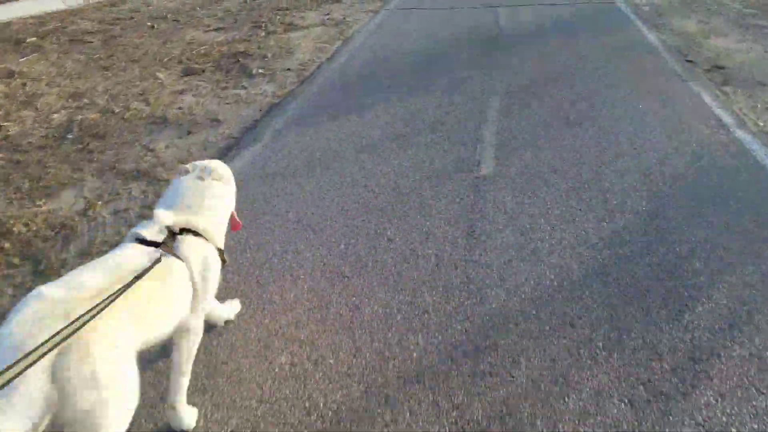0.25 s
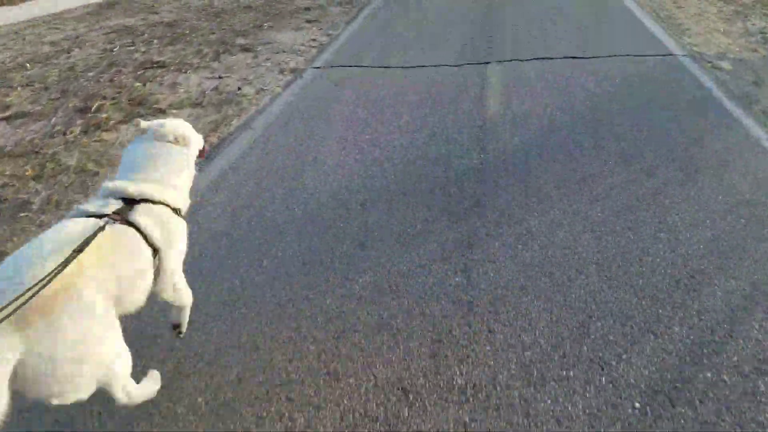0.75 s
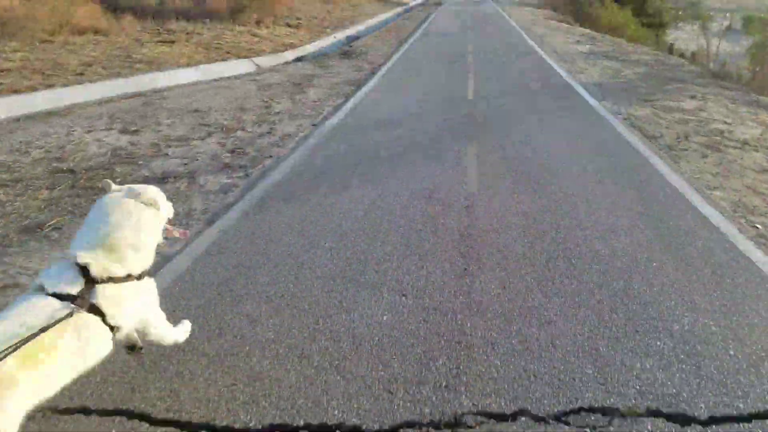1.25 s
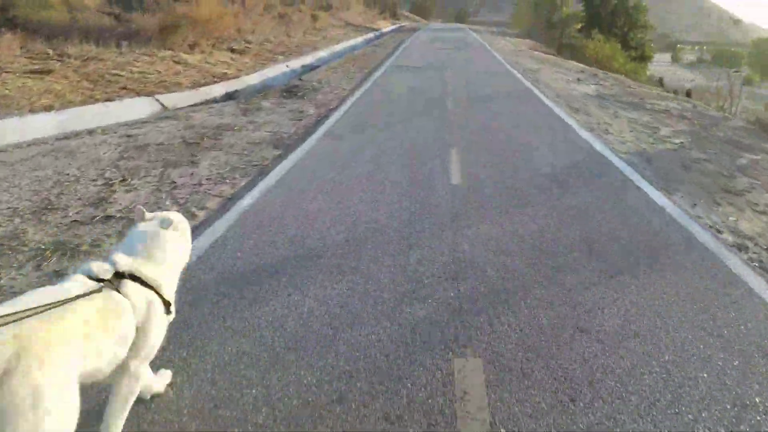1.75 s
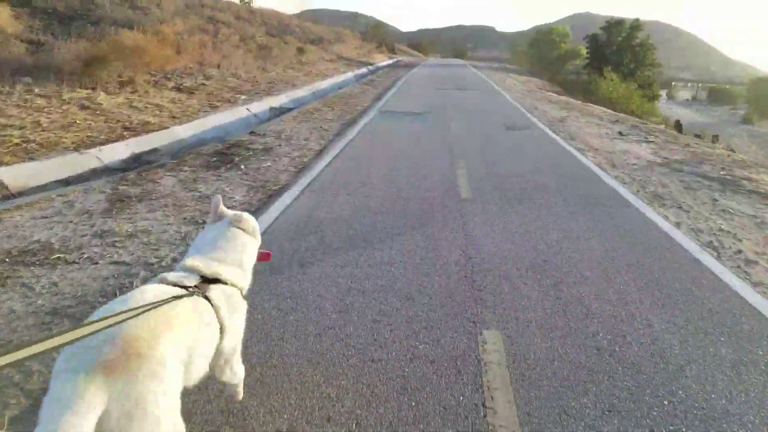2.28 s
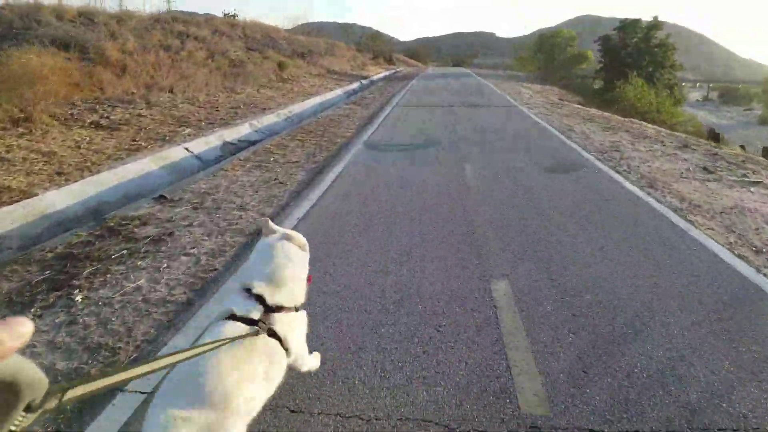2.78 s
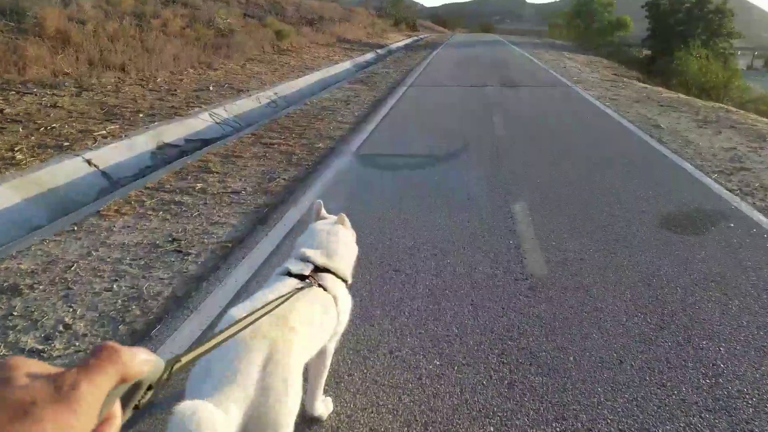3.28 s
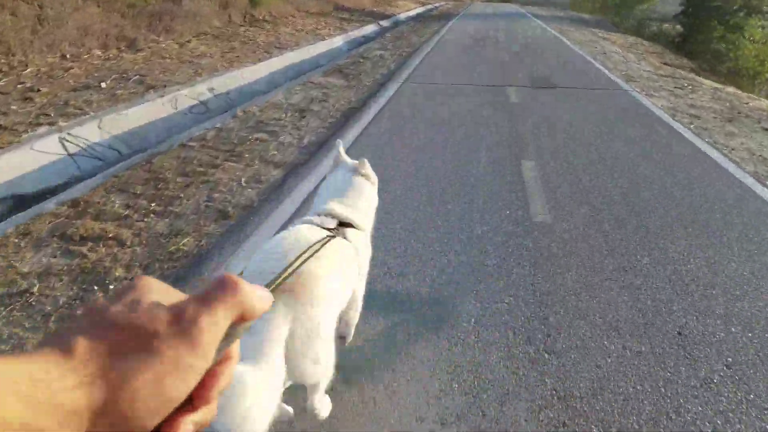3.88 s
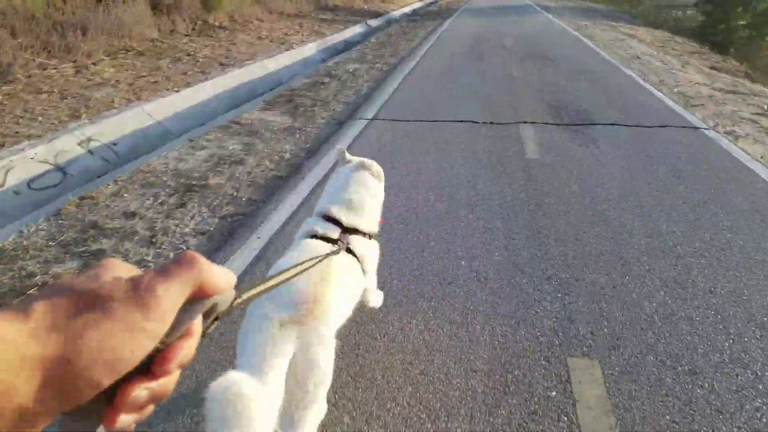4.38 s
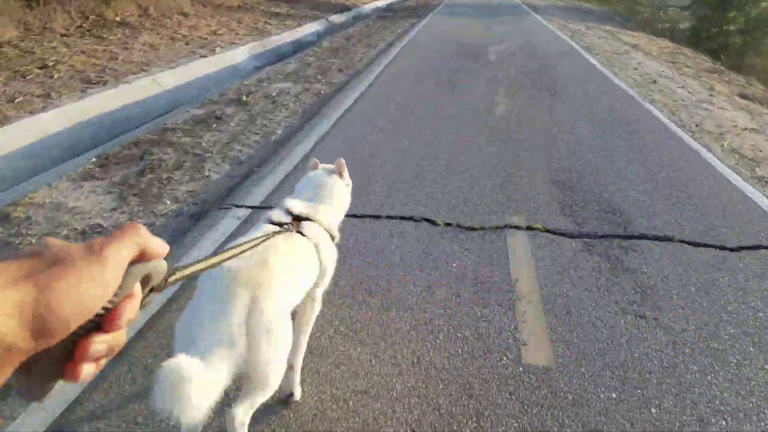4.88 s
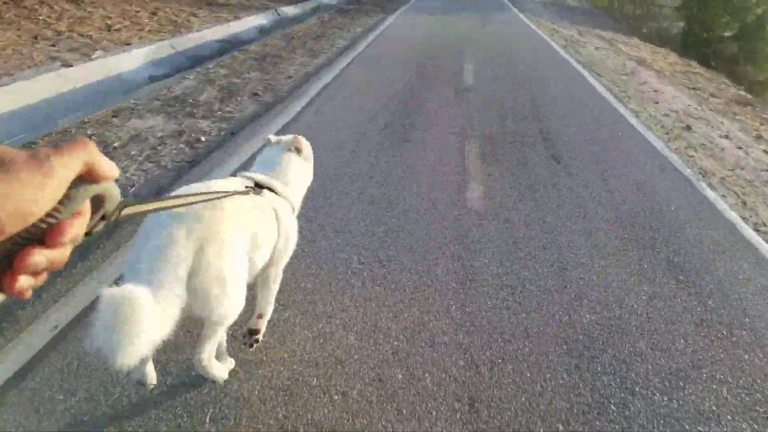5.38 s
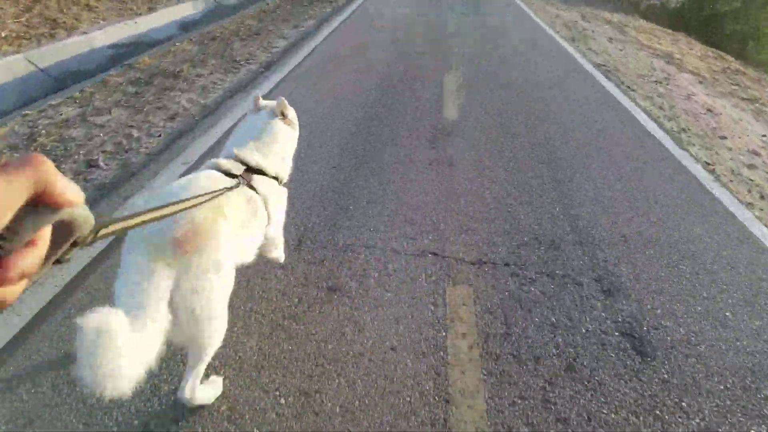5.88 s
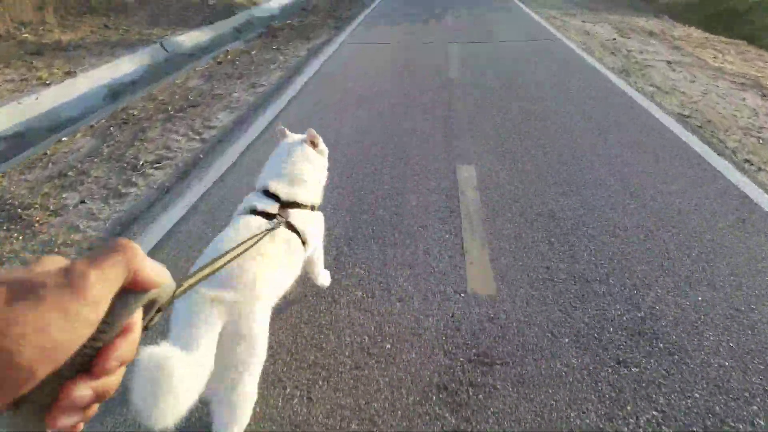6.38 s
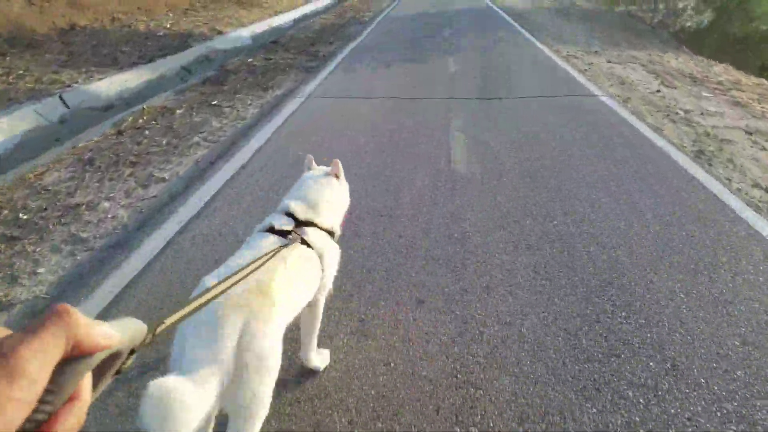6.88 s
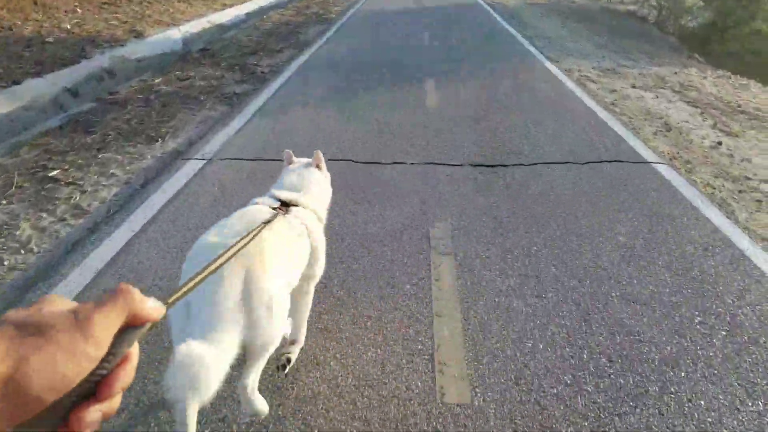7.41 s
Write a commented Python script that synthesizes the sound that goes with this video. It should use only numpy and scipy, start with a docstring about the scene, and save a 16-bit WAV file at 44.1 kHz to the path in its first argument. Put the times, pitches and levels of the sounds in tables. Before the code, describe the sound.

A steady gritty board roll on a paved trail, buffeted by bursts of wind, with dry dog claws ticking and faint tag clinks.

```python
"""Longboard ride behind a dog

A longboard rolls over asphalt, pulled by a trotting dog, heard through a two-port hand-held microphone.
Road grit shakes the deck in its low modes and hisses under the wheels; the axles knock over cracks.
Wind rumbles at each port on its own and tears into chains of bright pops, with small crackle around them.
Dry ticks, most of them the dog's claws, are short noise bursts; its metal tag clinks as two fading tones."""
import sys
import numpy as np
from scipy import signal
from scipy.fft import rfft, irfft
from scipy.io import wavfile
from scipy.ndimage import uniform_filter1d

SR = 44100
rng = np.random.default_rng(int(sys.argv[2]) if len(sys.argv) > 2 else 0)


def boost_factor(decibels):
    """Convert a level in decibels to a linear amplitude factor."""
    exponent = np.asarray(decibels, float) / 20
    return 10 ** exponent


def bounce(signal):
    """Save signal as a 16-bit WAV file at the path given by the first command-line argument."""
    frames = np.transpose(np.atleast_2d(signal))
    limited = np.clip(frames, -1, 1)
    pcm = np.round(limited * 32767).astype(np.int16)
    wavfile.write(sys.argv[1], SR, pcm)


N = 337365

# Road under the wheels: t/s, relative level of the coarse texture/dB, relative level of the fine grit/dB
ROAD = [(0.0, -20, -47), (0.36, -21, -47.5), (0.74, -14.5, -43), (0.98, -21, -47.5), (1.47, -19.5, -49.5),
        (2.071, -19, -48.5), (2.4, -17, -44.5), (3.3, -19, -48), (3.711, -17, -44.5), (4.22, -20, -47),
        (5.048, -14.5, -42.5), (5.39, -17, -44.5), (5.52, -14.5, -45), (5.59, -22, -48), (5.7, -21, -49),
        (5.88, -31, -51.5), (6.5, -25.5, -53), (6.95, -28, -48), (7.37, -19, -45.5), (7.65, -24.5, -50)]
# Colour of the hiss at each port, its top end cut off steeply:
# f/Hz, relative level left/dB, relative level right/dB
HISS_COLOUR = [(774, 26.5, 26), (1320, -21, -3.5), (1750, 14.5, 12), (2620, 8, 10), (2720, 1.5, 2.5),
               (4340, -2, 6), (7000, -6, -4), (7780, -7.5, -6.5), (8900, -27.5, -33.5), (10540, -7, -49.5),
               (13000, -13, -22), (14500, -6.5, -11.5), (15400, -56.5, -48)]
# Spells of rough air on one port: start t/s, length/s, drive/dB, port (0 left, 1 right)
ROUGH_AIR = [(0.032, 0.18, -11.5, 1), (0.786, 0.34, -11, 0), (0.921, 0.033, -4.5, 1), (1.031, 0.09, 2, 0),
             (1.144, .07, -8.5, 1), (1.217, 0.05, -3.5, 0), (1.418, 0.031, -2.5, 0), (1.647, 0.083, -7, 0),
             (1.767, 0.2, -12, 0), (1.834, 0.097, -13, 1), (2.303, 0.23, -11, 0), (2.442, 0.14, -11, 1),
             (2.587, 0.09, -3, 0), (2.954, 0.07, -6, 0), (3.054, 0.11, -9, 1), (3.081, .08, -5, 0),
             (4.055, 0.18, -15.5, 0), (5.249, 0.082, -10, 1), (5.324, 0.078, -11, 0),
             (5.529, 0.21, -11.5, 0), (5.733, 0.32, -10.5, 1), (6.187, 0.075, -4, 0), (6.277, 0.046, -1, 0),
             (6.349, 0.11, -11, 0), (6.639, 0.34, -12, 1)]


def evened(x):
    """Scales a sound to an rms of 1."""
    return x / np.sqrt(np.mean(x ** 2) + 1e-20)


def read(points, hz, order=1):
    """Reads one column of a spectrum table, on a log-frequency axis."""
    table = np.transpose(points)
    return np.interp(np.log(hz + 1), np.log(table[0] + 1), table[order])


def follow(rows, order):
    """Reads one column of a table over time, at every sample."""
    table = np.transpose(rows)
    return np.interp(np.arange(N) / SR, table[0], table[order])


def add(mix, s, sound):
    """Mixes a sound in at time s, cutting off what runs past the end."""
    part = mix[..., round(s * SR):][..., :sound.shape[-1]]
    part += sound[..., :part.shape[-1]]


def coloured(x, db):
    """Filters a sound by a function that gives dB for each Hz."""
    hz = np.fft.rfftfreq(x.shape[-1], 1 / SR)
    return irfft(rfft(x) * boost_factor(db(hz)), x.shape[-1])


def wander(seconds, channels=1):
    """Smooths noise twice into a slow random curve of rms 1."""
    span = max(int(seconds * SR), 1)
    once = uniform_filter1d(rng.standard_normal((channels, N)), span)
    return evened(uniform_filter1d(once, span))


def port_colour(hz):
    """Gives the hiss colour in dB at the left and right port."""
    return np.array([read(HISS_COLOUR, hz, order=1), read(HISS_COLOUR, hz, order=2)])


def ring(x, modes, bend=1):
    """Sums damped resonances, each with its own level at its top; bend scales their pitch over time."""
    out = np.zeros_like(x)
    for k, (hz, width, db) in enumerate(modes):
        r = np.exp(-np.pi * width / SR)
        turn = np.exp(2j * np.pi * np.cumsum(hz * bend * np.ones(x.shape[-1])) / SR)
        # Shift the mode down to 0 Hz, smooth there, then shift it back up
        smooth = signal.lfilter([1 - r], [1, -r], x / turn)
        out += (-1) ** k * boost_factor(db) * 2 * (turn * smooth).real
    return out


def board():
    """Grit and axle blows drive the same deck modes; both ports hear nearly the same."""
    # Ringing modes of the deck: f/Hz, width/Hz, relative level/dB
    deck_modes = [(222.6, 35, 6.5), (295.5, 89, 3), (441, 76, 7.5), (688, 85, -10), (917, 27, -18),
                  (1467, 1100, -29)]
    # Axle blows: t/s, deck level/dB, relative rattle level/dB, rattle length/s
    knocks = [(0.733, -21, -34.5, 0.012), (0.736, -18, -30, 0.002), (0.748, -8.5, -36.5, 0.008),
              (5.499, -1, -30, 0.004), (5.5025, 0, -35.5, 0.029), (5.523, -2, -41, 0.017),
              (5.656, -6.5, -44.5, 0.013), (5.671, -5.5, -48.5, 0.015)]
    grit = rng.standard_normal((3, N)) * boost_factor(1.9 * wander(0.007))
    bend = 1 + 0.016 * wander(0.067)[0]  # shifting weight bends the modes
    shake = ring(grit[0] + 0.14 * grit[1:], deck_modes, bend)
    soft = signal.butter(2, 1000, fs=SR, output="sos")  # soft wheels pass little treble to the deck
    out = evened(signal.sosfilt(soft, shake)) * boost_factor(follow(ROAD, order=1))

    push = np.pad(np.hanning(30), (0, 8000))  # the edge squashes the wheel for under a millisecond
    clack = (1360, 1700, -13)  # hard hit on the axle: f/Hz, width/Hz, relative level/dB
    blow = ring(push, deck_modes + [clack])
    t = np.arange(4000) / SR
    for s, deck_db, rattle_db, length in knocks:
        add(out, s, boost_factor(deck_db) * blow / abs(blow).max())
        loose = rng.standard_normal(4000) + 2.0 * rng.standard_normal((2, 4000))
        loose = loose * boost_factor(3 * evened(uniform_filter1d(rng.standard_normal(4000), 100)))
        rattle = coloured(loose, lambda hz: 0.7 * port_colour(hz))
        add(out, s, boost_factor(rattle_db) * rattle * np.exp(-(t / length) ** 3))
    return out * boost_factor([[1.5], [0]])


def wheels():
    """Fine grit hisses in drifting patches, partly shared by the ports; a faint whistle rises and chirps."""
    # Whistle in the hiss: t/s, f/Hz, relative level/dB
    whistle_path = [(2.0, 3400, -74), (2.12, 3420, -50.5), (2.4, 3764, -50), (2.58, 4040, -51),
                    (2.72, 3950, -71), (7.44, 2750, -75.5), (7.472, 2670, -38), (7.51, 2730, -73.5)]
    grit = rng.standard_normal((3, N)) * boost_factor(2.2 * wander(0.0027))  # single stones stand out
    hz, t, z = signal.stft(0.75 * grit[0] + grit[1:], SR, nperseg=512)
    patches = uniform_filter1d(rng.standard_normal(z.shape[1:]), 6, 0)  # over frequency
    patches = evened(uniform_filter1d(patches, 12, 1))  # over time
    road_s, _, road_db = np.transpose(ROAD)
    grit_db = np.interp(t, road_s, road_db)
    upper = np.clip((hz[:, None] - 2600) / 500, 0, 1)
    level = grit_db - 0.5 * (1 - upper)  # the lower hiss is half a dB weaker
    gain = boost_factor(port_colour(hz)[:, :, None] + level + 2.3 * patches)
    hiss = signal.istft(z * gain, nperseg=512)[1][:, :N]

    # Slow noise, about 160 Hz wide, carried on the whistle's pitch
    fuzz = signal.lfilter([1], [1, -np.exp(-np.pi * 160 / SR)], grit[0] + 1j * grit[1])
    turn = np.exp(2j * np.pi * np.cumsum(follow(whistle_path, order=1)) / SR)
    whistle_db = follow(whistle_path, order=2) + np.array([[-4], [3]])
    whistle = evened((fuzz * turn).real) * boost_factor(whistle_db)
    return hiss * boost_factor(0.52 * wander(0.0067)) + whistle


def wind():
    """Lumpy low pressure noise, unrelated at the two ports."""
    # Wind over time: t/s, relative rumble level/dB, left minus right level/dB
    wind_path = [(0.0, -25.5, -17.5), (0.7, -20, -5.5), (0.85, -12, -3.5), (1.05, -15, 9.5),
                 (1.2, -19, -14.5), (1.43, -21, 17.5), (1.89, -20.5, -10.5), (2.33, -18.5, 12.5),
                 (2.47, -13.5, 3.5), (3.05, -16.5, 5.5), (3.92, -24, 7.5), (4.37, -16.5, 5),
                 (4.68, -24.5, 9), (4.82, -17, 11.5), (5.26, -13, -3), (5.69, -17.5, -1), (6.01, -16, -1.5),
                 (6.33, -15.5, 9), (6.54, -19.5, -9), (7.2, -19, -9.5), (7.65, -18, -6)]
    # Colour of the rumble: f/Hz, relative level/dB
    rumble_colour = [(20, -23), (50, -4), (100, 1.5), (180, -1.5), (300, -7), (500, -16.5), (800, -21.5),
                     (1500, -58.5), (3000, -97)]
    noise = rng.standard_normal((2, N))
    rumble = evened(coloured(noise, lambda hz: read(rumble_colour, hz)))
    lean = follow(wind_path, order=2) / 2
    lumps = 2.0 * wander(0.065, channels=2)
    return rumble * boost_factor(follow(wind_path, order=1) + np.array([lean, -lean]) + lumps)


def flurry(start, length, db, port):
    """Rough air makes a chain of pops of uneven gap and strength; a harder drive packs them closer."""
    gap, strength = np.clip(rng.standard_normal((60, 2)).T, -2, 2)
    gap_s = 0.0072 * boost_factor(-0.6 * db) * np.exp(0.411 * gap)
    s = start + np.cumsum(gap_s)
    rows = zip(s, db + 2 * strength, [port] * len(s))
    return [row for row in rows if row[0] < start + length]


def gusts():
    """Eddies burst on one port as short pops; the harder the pop, the higher it reaches."""
    # Single pops, strong and faint: t/s, drive/dB, port (0 left, 1 right)
    single_pops = [(.018, -5, 1), (.054, -1.5, 1), (0.173, -5.5, 1), (0.48, 3.5, 0), (0.808, -1.5, 0),
                   (0.853, 3, 0), (0.87, 4.5, 0), (0.896, 0.5, 0), (.915, -0.5, 1), (.92, 1.5, 0),
                   (0.946, -1.5, 0), (.975, 5, 0), (0.983, 2.5, 0), (1.009, 0, 0), (1.029, 6, 0),
                   (1.035, 5, 0), (1.045, 7.5, 0), (1.059, -3, 0), (1.061, 7, 0), (1.066, 2.5, 0),
                   (1.08, 7, 0), (1.09, 2.5, 0), (1.098, -14, 0), (1.111, -9, 0), (1.206, 0, 1),
                   (1.242, 9.5, 0), (1.26, 0.5, 0), (1.384, -5, 0), (1.417, 8.5, 0), (1.4175, 2.5, 0),
                   (1.638, 3.5, 0), (1.669, -0.5, 0), (1.682, 1, 0), (1.695, -1.5, 0), (1.718, -4, 0),
                   (1.788, 1, 0), (1.847, -0.5, 1), (1.909, -0.5, 0), (1.952, 0.5, 1), (1.967, 0, 0),
                   (1.976, 1.5, 0), (2.161, -9, 1), (2.332, -3.5, 0), (2.412, -9, 0), (2.431, -1.5, 1),
                   (2.463, -2, 1), (2.477, -6, 1), (2.481, -2, 0), (2.55, 0.5, 0), (2.588, -3.5, 0),
                   (2.606, -2.5, 0), (2.622, 2, 0), (2.634, 2.5, 0), (2.647, -2, 0), (2.659, -5, 0),
                   (2.681, 1, 0), (2.971, 3, 0), (2.98, 3.5, 0), (3.019, 0, 0), (3.054, -5.5, 1),
                   (3.083, 0.5, 0), (3.132, 2, 0), (3.141, 2.5, 0), (3.327, -1, 0), (3.387, -4, 0),
                   (3.502, 1.5, 0), (3.761, -3.5, 0), (4.066, -7, 0), (4.234, -6, 0), (4.366, -2.5, 0),
                   (4.42, -5, 0), (5.284, -10, 1), (5.342, -6, 0), (5.37, -6, 1), (5.372, -3, 0),
                   (5.566, -1.5, 0), (5.626, -3.5, 0), (5.69, 0, 0), (5.73, 0.5, 0), (5.789, -8, 1),
                   (5.88, -11, 1), (5.896, -2, 1), (5.953, -1.5, 1), (6.125, -1.5, 1), (6.184, -5, 0),
                   (6.201, -19, 0), (6.212, -12, 0), (6.233, 3, 0), (6.286, 2, 0), (6.3, -2, 0),
                   (6.3103, 1, 0), (6.3198, 2, 0), (6.392, -2.5, 0), (6.632, -8, 0), (6.64, -3.5, 1),
                   (6.671, -2, 1), (6.739, -0.5, 1), (6.756, -1, 1), (6.813, 1.5, 1), (6.96, -5, 1)]
    out, eddies = np.zeros((2, N)), rng.standard_normal((2, N + 4096))
    t = np.arange(-2048, 2048) / SR
    chains = sum((flurry(*row) for row in ROUGH_AIR), [])
    for s, db, port in single_pops + chains:
        eddy = eddies[round(port), round(s * SR):][:4096]
        width = 0.0027 * np.exp(0.54 * np.tanh(eddy[0]))  # seconds, different for each pop
        core = np.exp(-(2 * t / np.where(t < 0, 0.69 * width, width)) ** 2)
        jolt = 0.76 * np.linalg.norm(core) * np.sign(eddy[1])
        eddy = eddy + jolt * (t == 0)  # one sudden jolt at its heart
        skirt = 0.23 * np.exp(-abs(t) / np.where(t < 0, 0.005, 0.009))  # the flutter around each pop
        corner_hz = 1450 * boost_factor(0.5 * db)

        def colour(hz):
            """Takes away treble above the corner and bass well below it."""
            treble = -7 * np.minimum(hz / corner_hz, 4) ** 1.905
            return treble - 9 * np.log10(1 + (0.29 * corner_hz / (hz + 1)) ** 2)

        # Set the strength by the part of the core above 1 kHz (bin 93)
        snap = np.linalg.norm(rfft(coloured(eddy * core, colour))[93:]) / np.sqrt(2048)
        pop = coloured(eddy * (core + skirt), colour) * np.linalg.norm(core) / snap
        cut = max(2048 - round(s * SR), 0)  # leave out what falls before time 0
        add(out[round(port)], s + t[cut], boost_factor(db - 19) * pop[cut:])
    return out


def crackle():
    """Small random pops, made by strongly swinging noise, crowd in and around the spells of rough air."""
    rough, t = np.zeros((2, N)), np.arange(N) / SR
    for start, length, _, port in ROUGH_AIR:
        away = np.maximum(np.maximum(start - t, t - start - length), 0)
        rough[round(port)] += np.exp(-away / 0.099)  # falls to about a third in 0.1 s

    def colour(hz):
        """Takes away treble above 1100 Hz and bass below 300 Hz."""
        return -10 * np.log10((1 + (hz / 1100) ** 7.4) * (1 + (300 / (hz + 1)) ** 2))

    pops = rng.standard_normal((2, N)) * boost_factor(12.5 * np.minimum(wander(0.0058, channels=2), 2))
    return evened(coloured(pops, colour)) * (0.11 + np.minimum(rough, 1)) * boost_factor([[-32], [-31]])


def dog():
    """Dry ticks, mostly claws on the asphalt, are noise bursts; a small metal tag rings in two modes."""
    # Main dry ticks, most of them claws, one on a wind pop: t/s, relative level/dB
    main_ticks = [(0.236, -35), (0.477, -40), (0.674, -38), (0.853, -38), (1.417, -37), (1.6574, -37),
                  (1.686, -35), (1.842, -39), (2.066, -46), (2.373, -41), (2.587, -38), (2.767, -36.5),
                  (2.862, -37), (2.895, -36), (3.172, -45.5), (3.39, -35), (3.5677, -43), (3.661, -50),
                  (3.728, -42), (3.7898, -38.5), (4.746, -41), (4.95, -42.5), (5.4613, -34.5),
                  (6.1605, -39.5)]
    # Tag clinks: t/s, relative level/dB, share of the low mode (0-1)
    clinks = [(0.3636, -54, 0.5), (1.488, -51, 0.66), (2.6635, -55, 0.8), (3.089, -55, 0.7),
              (4.2622, -52, 0.2), (4.6204, -56, 0.5), (6.696, -53, 0.4)]
    # Modes of the tag: f/Hz, relative level/dB, time to fade by 60 dB/s
    tag_modes = [(5750, 2, 0.085), (13550, 9, .07)]
    # Colour of a tick: f/Hz, relative level/dB
    tick_colour = [(1500, -30.5), (4000, 1.5), (9000, 7.0), (14000, 12.5), (16000, -4.5)]
    out, t = np.zeros((2, N)), np.arange(3000) / SR
    gap, strength = rng.standard_normal((40, 2)).T
    light_s = np.cumsum(0.29 * np.exp(0.67 * gap))  # light claw ticks at random gaps
    light_ticks = zip(light_s, -50 + 5 * strength)
    fade = np.exp(-t / 0.00006) + 0.029 * np.exp(-t / 0.0092)  # sharp click and faint tail
    for s, db in main_ticks + list(light_ticks):
        tick = (rng.standard_normal(3000) + 0.28 * rng.standard_normal((2, 3000))) * fade
        add(out, s, boost_factor(db) * coloured(tick, lambda hz: read(tick_colour, hz)))
    low, high = (boost_factor(db - 60 * t / t60) * np.sin(2 * np.pi * hz * t) for hz, db, t60 in tag_modes)
    for s, db, share in clinks:
        add(out, s, boost_factor(db) * (share * low + high) * np.minimum(t / 0.003, 1))
    return out * boost_factor([[1.5], [0]])


def scene():
    """Road and dog reach the left port a little sooner; wind acts on each port directly."""
    left, right = board() + wheels() + dog()
    left = np.roll(left, -4)  # samples
    return np.array([left, right]) + wind() + gusts() + crackle()


def low_pass(x):
    """Removes everything above the highest recorded frequency."""
    return signal.sosfilt(signal.butter(12, 15690, fs=SR, output="sos"), x)


def record(dry):
    """Peaks squash softly, never passing about 0.73 of full scale."""
    squashed = 0.85 * dry / (1 + (1.16 * dry) ** 4) ** (1 / 4)
    return low_pass(squashed)


dry = scene()
out = record(dry)
bounce(out)
```